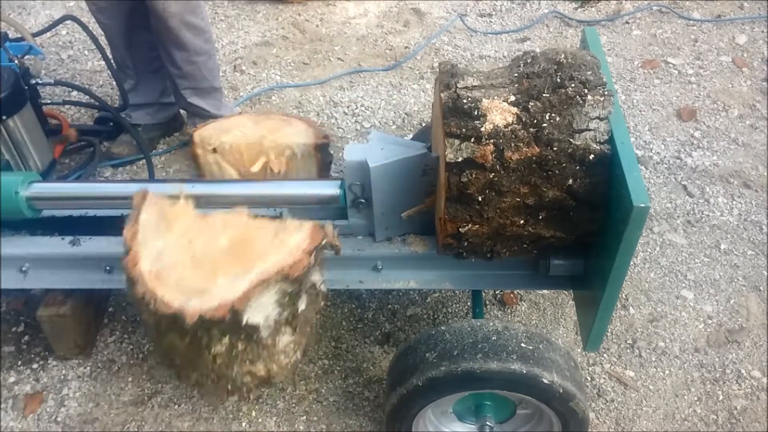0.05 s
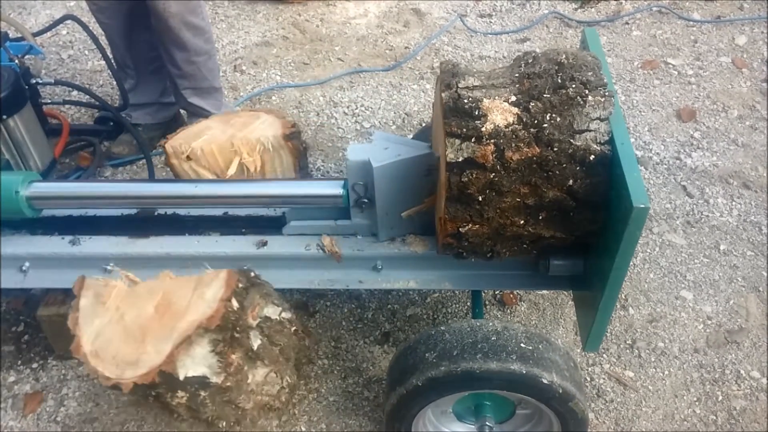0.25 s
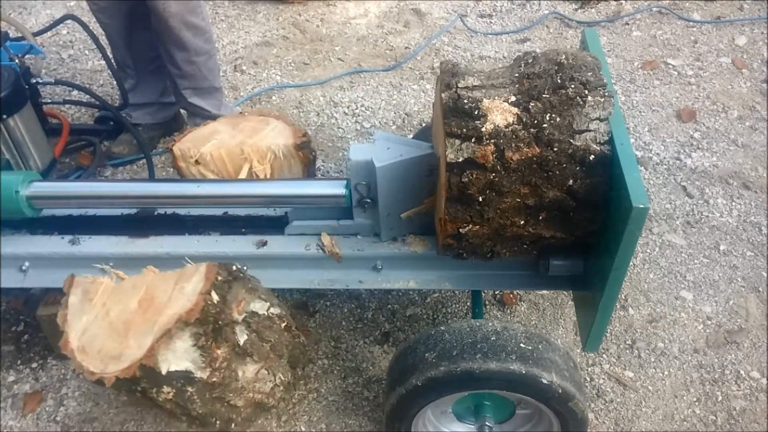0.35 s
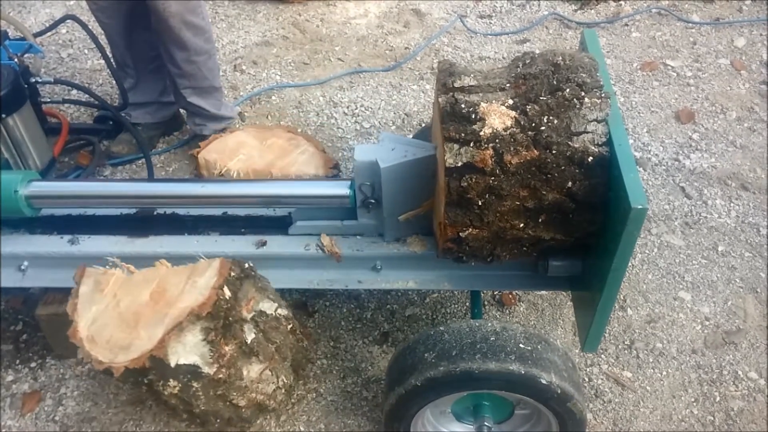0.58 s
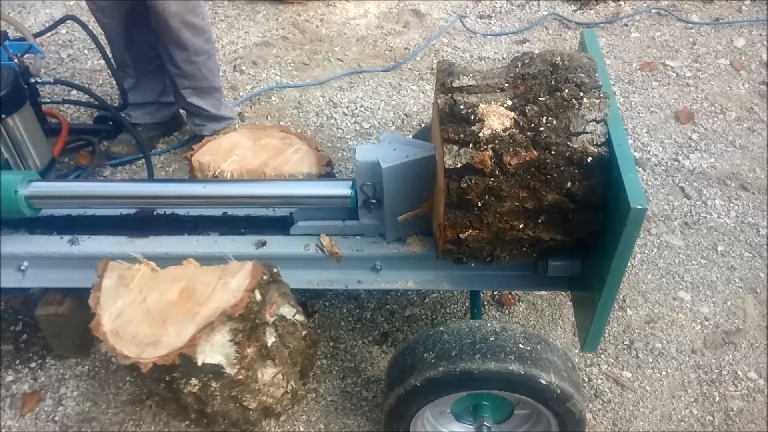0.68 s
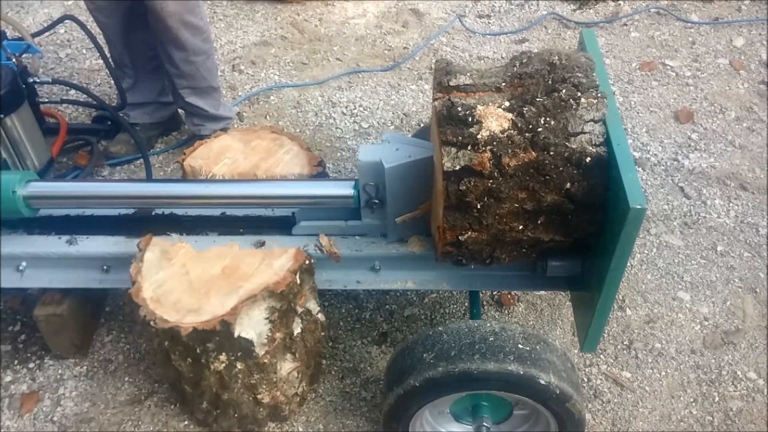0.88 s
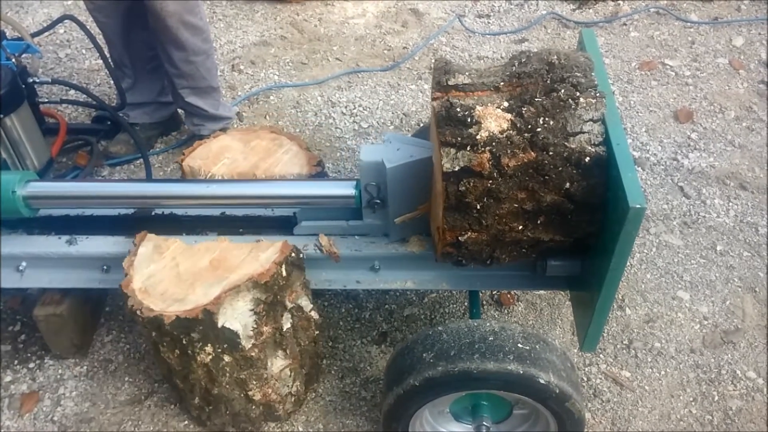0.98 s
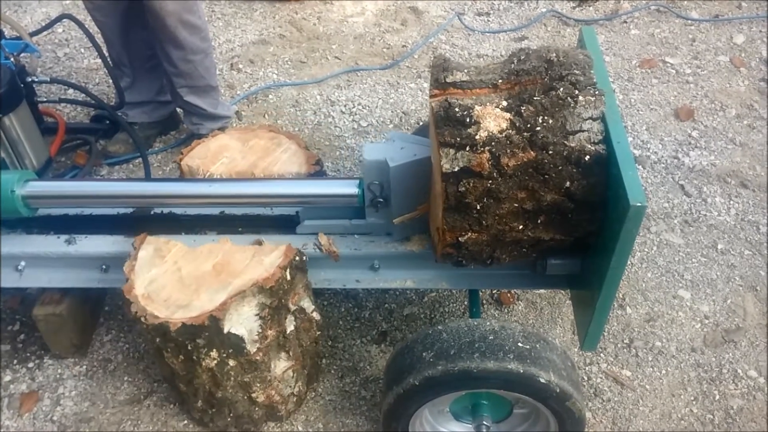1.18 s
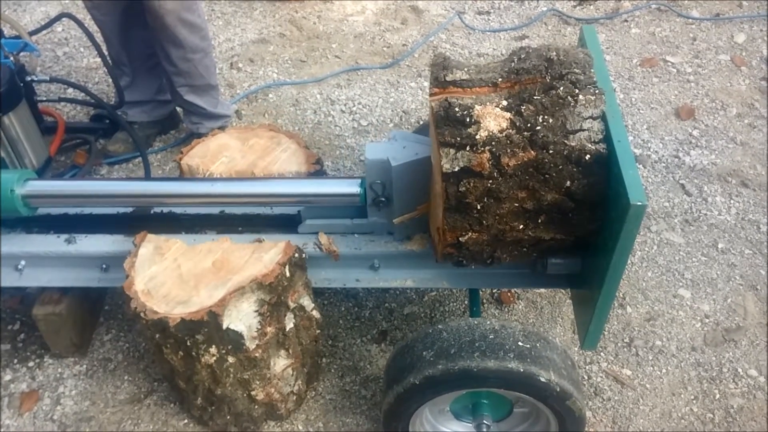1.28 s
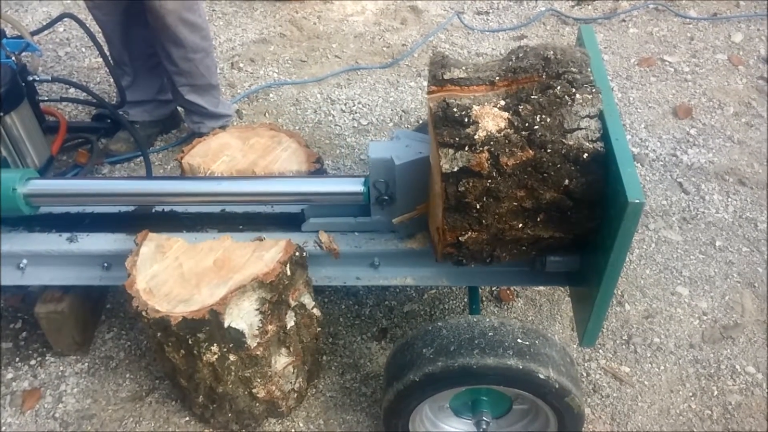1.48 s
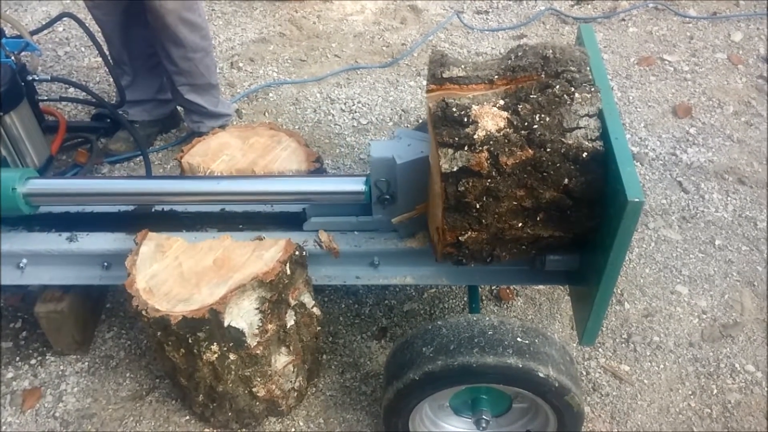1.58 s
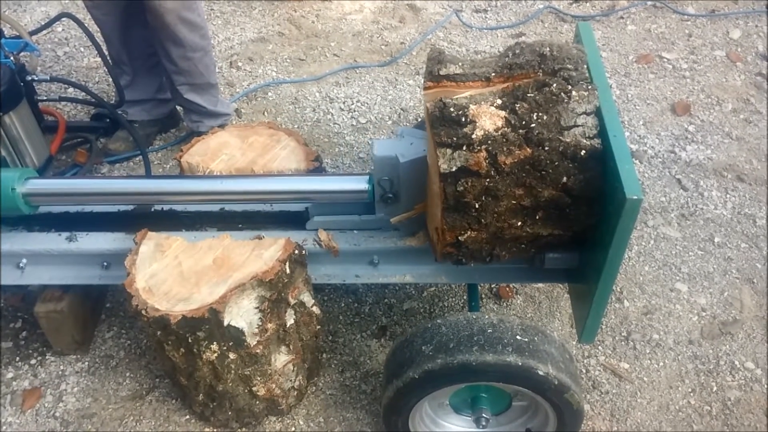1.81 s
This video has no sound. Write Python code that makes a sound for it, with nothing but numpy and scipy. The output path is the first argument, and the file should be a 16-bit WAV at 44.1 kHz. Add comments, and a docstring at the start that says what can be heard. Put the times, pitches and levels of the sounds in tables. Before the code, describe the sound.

A hydraulic log splitter cracks a thick log open over a steady motor hum.

```python
"""A hydraulic log splitter runs outdoors: motor whirr and a thin pump whine throughout.
First a half log, already split, scrapes, drops on gravel with a thud and rocks once.
From about 0.4 s the wedge tears a thick log open in sharp cracks, each an avalanche of tiny clicks
that rings the wood. The loaded pump hums and its oil hisses. Fibres crackle between the cracks;
after 1 s both thin out as the split runs. Short echoes follow the wood sounds."""
import sys
import numpy as np
from scipy import signal
from scipy.fft import rfft, irfft
from scipy.io import wavfile

SR = 44100
rng = np.random.default_rng(int(sys.argv[2]) if len(sys.argv) > 2 else 0)


def pcm_store(signal):
    """Save signal as 16-bit PCM."""
    levels = np.round(np.clip(np.atleast_2d(signal), -1, 1) * 32767)
    wavfile.write(sys.argv[1], SR, levels.astype(np.int16).T)


N = 81585

# motor and pump tones: (frequency [Hz], idle level [dB], loaded level [dB])
MOTOR_TONES = [(291.8, -45, -46.5), (494, -48.5, -58), (588, -47.5, -50.5), (614.6, -42, -36),
               (640, -71, -44), (885, -52.5, -57), (915, -69, -47), (940, -74, -48), (1110, -49.5, -51.5),
               (1882, -59, -53), (2053, -74, -54.5), (2384, -56, -54), (2912, -47.5, -65), (5690, -63, -60),
               (6930, -61, -78), (7290, -67, -72)]
# pump load: (time [s], load [1 = pushing through the log])
LOAD_CURVE = [(0, 0), (.4, 0.2), (.65, 0.41), (.9, 1.28), (1.3, 1.05), (1.85, 0.87)]
# fan and bearings: (frequency [Hz], relative density [dB])
WHIRR_SPECTRUM = [(20, -51), (45, -9), (100, -2.5), (200, -12.5), (350, -2), (550, 3), (750, -4), (950, -1),
                  (1250, -9.5), (1900, 0), (2400, -3.5), (2750, -9), (3500, -17), (4500, -28),
                  (7500, -18.5), (10000, -27.5), (16000, -29)]
# oil under pressure: (frequency [Hz], relative density [dB])
OIL_SPECTRUM = [(300, -20), (1600, 1), (3500, 9), (7500, -18), (10500, -31), (16000, -24)]
# echo colour: (frequency [Hz], gain [dB])
ECHO_SPECTRUM = [(60, -22), (300, -2), (1000, 4.5), (4000, -0.5), (15000, -3)]
# stereo width: (frequency [Hz], side re mid [dB])
SIDE_SPECTRUM = [(60, -3), (250, -22), (500, -11.5), (1000, -7), (2000, -0.5), (4000, 1), (8000, 1),
                 (14000, 1)]
# half log meets the ground: (time [s], length [s], pitch [Hz], level [dB])
THUD_EVENTS = [(.005, 0.043, 90, -32), (0.07, 0.01, 90.5, -26), (0.2427, 0.026, 104.7, -1),
               (.45, 0.0315, 159.3, -13), (.495, 0.049, 145, -25), (0.602, 0.0167, 142.6, -11.5)]
# ground rumble: (frequency [Hz], relative density [dB])
GROUND_SPECTRUM = [(20, -55), (38, -36), (60, -6), (80, 13.5), (130, 6), (250, -3.5), (600, -51),
                   (3000, -76)]
# half log scrapes and knocks:
# (time [s], contact [s], body [dB], clack [dB], grit [dB], pan L-R [dB], pitch [Hz], ring [dB])
KNOCK_EVENTS = [(.004, 0.022, -33, -31.5, -43, -1, 2170, -32),
                (.102, 0.0037, -30.5, -52, -64, 1, 760, -28.5),
                (.2405, 0.0031, -15.5, -18.5, -27, -3, 1580, -20),
                (.3028, 0.002, -22, -7, -20, 1, 1030, -15.5)]
# log on the steel beam: (frequency [Hz], relative level [dB], t60 [s])
LOG_MODES = [(196.6, -9.5, 0.029), (243.4, -0.5, 0.066), (271.3, -2.5, 0.064), (349, 4, .04),
             (409, 1, 0.055), (504, -7, 0.11), (588, 2, 0.021), (664, -5.5, 0.017), (782, -6.5, 0.031),
             (985, -8.5, .03)]
# snap of a break: (frequency [Hz], relative gain [dB])
SNAP_SPECTRUM = [(100, -18.5), (400, -7), (800, -2), (1050, 6.5), (1320, 0), (1620, 4.5), (1850, -1),
                 (2250, 4), (2800, -4.5), (3600, -6.5), (5000, -26.5), (9000, -38), (16000, -57)]
# fine splinters: (frequency [Hz], relative gain [dB])
SPLINTER_SPECTRUM = [(500, -25), (2500, -7.5), (4100, 4.5), (4800, 2), (5900, 4), (7200, -2.5),
                     (9300, -8.5), (10500, -21.5), (13500, -13), (16000, -23)]
# fibre crackle envelope: (time [s], gain [dB])
CRACKLE_CURVE = [(0, -22.5), (.33, -16.5), (.42, -8.5), (.47, 2), (.6, -4), (.72, -2), (.86, 1), (.97, 2),
                 (1.08, -11.5), (1.25, -8), (1.4, -19), (1.85, -15.5)]
# cracks, each ringing a freed sliver:
# (time [s], tearing [s], body [dB], snap [dB], splinter [dB], pan L-R [dB], pitch [Hz], ring [dB])
CRACK_EVENTS = [(.355, 0.017, -63, -30, -40.5, -0.5, 1100, -36),
                (.412, 0.0082, -46, -27, -53, 0, 1064, -25.5),
                (.432, 0.0069, -26, -14, -46, 0.5, 1660, -21),
                (.438, 0.011, -12.5, -9.5, -21.5, 0, 1060, -38),
                (.447, 0.008, -11, -13.5, -25, -0.5, 2280, -54),
                (.460, 0.0098, -12, -17.5, -20.5, -1, 2460, -16),
                (.476, 0.0172, -20.5, -41, -56, -6, 780, -40),
                (.505, 0.0023, -16.5, -21.5, -23.5, -1, 3280, -16.5),
                (.5482, 0.0033, -7, -7.5, -13, 1.5, 1870, -18.5),
                (.589, 0.0072, -18.5, -23.5, -25, 0.5, 2630, -34),
                (.624, 0.0036, -18, -24.5, -28, -0.5, 2880, -27),
                (.670, 0.0044, -30.5, -35, -48, -2, 2200, -28.5),
                (.712, 0.004, -17.5, -19.5, -20.5, -0.5, 4340, -21.5),
                (.747, .003, -28, -28, -28, 1, 4300, -29), (.788, 0.0049, -15.5, -36, -20, 0.5, 703, -17),
                (.7955, 0.0039, -9.5, -10, -22.5, 0, 2150, -17),
                (.836, 0.0024, -23, -26, -28.5, 2, 2584, -30), (.870, 0.0027, -37, -27, -35, 7, 705, -24),
                (.885, 0.0044, -34, -19, -37, 1, 2660, -23.5),
                (.897, 0.0026, -38, -26, -19.5, 3, 4000, -24),
                (.920, 0.0064, -21, -24, -51, -1.5, 1040, -28),
                (.9525, 0.0064, -20, -18.5, -36, 0.5, 3960, -21.5),
                (1.012, 0.00052, -48, -38, -49, -1, 2420, -17.5),
                (1.047, 0.0061, -19, -27, -40, -3, 5300, -40),
                (1.056, 0.0017, -27, -13, -13.5, 1, 3430, -21.5),
                (1.065, 0.0011, -16, -25, -36, 2, 969, -17),
                (1.098, 0.0038, -25, -31, -30.5, 2, 1980, -31.5),
                (1.131, .002, -28.5, -28.5, -40, -2, 3100, -27),
                (1.153, 0.0027, -17.5, -31, -36, -1, 2090, -24),
                (1.169, 0.0015, -38, -34, -28, 0, 2132, -41),
                (1.2078, 0.0023, -17.5, -15, -21.5, 1.5, 2180, -15),
                (1.220, 0.0036, -13.5, -15.5, -22.5, -0.5, 2120, -21),
                (1.249, 0.0024, -24.5, -33, -30.5, 0.5, 1870, -35),
                (1.284, 0.0014, -29.5, -38, -27, 0.5, 2020, -26.5),
                (1.335, 0.0078, -60, -33, -39, -3.5, 2410, -29.5),
                (1.441, 0.0017, -37, -34.5, -54, -2, 2170, -28),
                (1.457, 0.00096, -38, -41, -27, -5, 3300, -22),
                (1.5665, .003, -19, -13.5, -47, 1, 790, -18),
                (1.5815, 0.0024, -28.5, -20.5, -23, 0, 784, -17),
                (1.6565, 0.0015, -37, -16, -23.5, -0.5, 2200, -17),
                (1.724, 0.00087, -60, -37, -25.5, -1, 1670, -22.5)]

BODY_PAN_DB, SNAP_PAN_DB, SPLINTER_PAN_DB, SLIVER_PAN_DB = 3, -2, -1.5, -1
BODY_DECAY_S, SNAP_DECAY_S, SPLINTER_DECAY_S, SLIVER_DECAY_S = 0.0018, 0.0029, 0.0025, 0.0029
RISE_S, BODY_LAG_S, BODY_CUT_HZ, SLIVER_T60_CYCLES = 0.00014, 0.0015, 227, 36


def amp(db):
    """dB to gain."""
    return 10 ** (np.asarray(db) / 20)


def unit(x):
    """Scale to rms 1."""
    return x / np.sqrt(np.mean(x ** 2) + 1e-20)


def curve(points):
    """Breakpoints to a per-sample curve."""
    return np.interp(np.arange(N) / SR, *np.transpose(points))


def gain_at(spectrum, hz):
    """Linear gain of a dB spectrum, interpolated in log frequency."""
    points_hz, db = np.transpose(spectrum)
    return amp(np.interp(np.log(hz + 1), np.log(points_hz), db))


def add(mix, time_s, sound):
    """Mix in a stereo sound at time_s."""
    part = mix[:, max(round(time_s * SR), 0):][:, :sound.shape[1]]
    part += sound[:, :part.shape[1]]


def colour(spectrum, size=2048):
    """Causal impulse response of a spectrum."""
    log_gain = np.log(gain_at(spectrum, abs(np.fft.fftfreq(size, 1 / SR))))
    return np.fft.ifft(np.exp(np.conj(signal.hilbert(log_gain)))).real


def through(x, response):
    """Filter each channel."""
    return signal.fftconvolve(x, response[None], axes=1)[:, :x.shape[1]]


def pan(db):
    """Channel gains, left minus right = db."""
    return amp([[db / 2], [-db / 2]])


def place(pair, pan_db=0):
    """Direct and scattered signal to stereo, rms 1; widest in the treble."""
    mid = unit(pair[0])
    side = through(unit(pair[1:]), colour(SIDE_SPECTRUM))[0]
    return unit(np.array([mid + side, mid - side]) * pan(pan_db))


def clicks(size, per_s, spread_db):
    """Two random click trains of uneven strength."""
    strength = amp(spread_db * np.minimum(rng.exponential(1, (2, size)), 4))
    return strength * rng.choice([-1, 1], (2, size)) * (rng.random((2, size)) < per_s / SR)


def drift(hz):
    """Random wavering below hz, rms 1."""
    rolloff = 1 + (np.fft.rfftfreq(N, 1 / SR) / hz) ** 4
    return unit(irfft(rfft(rng.standard_normal(N)) / rolloff, N))


def noise(size, spectrum):
    """Shaped stereo noise, rms 1."""
    white = rfft(rng.standard_normal((2, size)))
    return place(irfft(white * gain_at(spectrum, np.fft.rfftfreq(size, 1 / SR)), size))


def ring(hz, t60_s):
    """One damped mode."""
    t = np.arange(SR // 8) / SR
    return np.exp(-np.log(1000) * t / t60_s) * np.sin(2 * np.pi * hz * t)


def motor_and_pump(waver=0.0021, flutter=0.32, width_rad=0.39, whirr_db=-40.5, oil_db=-51.5):
    """Steady whirr; load turns the pump whine into a hum and raises the oil hiss."""
    shaft_time_s = np.cumsum(1 + waver * drift(hz=12.4)) / SR
    load = curve(LOAD_CURVE)
    tones = np.zeros((2, N))
    for hz, idle_db, loaded_db in MOTOR_TONES:
        phase = 2 * np.pi * (hz * shaft_time_s + rng.random())
        rms = amp(idle_db + load * (loaded_db - idle_db)) * (1 + flutter * drift(hz=9.1))
        tones += np.sqrt(2) * rms * np.sin(phase + np.array([[width_rad], [-width_rad]]))
    whirr = amp(whirr_db) * noise(N, WHIRR_SPECTRUM)
    oil_hiss = amp(oil_db) * load * noise(N, OIL_SPECTRUM)
    return tones + whirr + oil_hiss


def yard_echoes(x, gain_db=-13.5, t60_s=0.17, delay_s=0.0054):
    """Short, thin reflections off machine and ground."""
    t = np.arange(SR // 2) / SR
    envelope = (t > delay_s) * np.exp(-np.log(1000) * t / t60_s)
    tail = place(envelope * clicks(len(t), per_s=2000, spread_db=0.68)) / np.sqrt(len(t))
    echoes = signal.fftconvolve(x, tail, axes=1)[:, :N]
    return amp(gain_db) * through(echoes, colour(ECHO_SPECTRUM))


def ground_thuds(sag=0.28, rumble_db=-13, rumble_decay_s=0.035, pan_db=2.5):
    """Half log lands: a few low swings of sagging pitch, then a rumble as it settles."""
    out, t = np.zeros((2, N)), np.arange(SR // 3) / SR
    for time_s, length_s, hz, db in THUD_EVENTS:
        progress = np.minimum(t / length_s, 1)
        phase = 2 * np.pi * np.cumsum(hz * (1 + sag * (.5 - progress))) / SR
        push = -np.sin(np.pi * progress) ** 2 * np.sin(phase)
        settling = amp(rumble_db) * progress * np.exp(-t / rumble_decay_s)
        add(out, time_s, amp(db) * (push + settling * noise(len(t), GROUND_SPECTRUM)))
    return out * pan(pan_db)


def wood_voices():
    """Ringing body, snap, splinters: (impulse response, click decay [s], pan L-R [dB])."""
    modes = sum(amp(db) * ring(hz, t60_s) for hz, db, t60_s in LOG_MODES)
    body = signal.sosfilt(signal.butter(2, BODY_CUT_HZ, "high", fs=SR, output="sos"), modes)
    return [(body, BODY_DECAY_S, BODY_PAN_DB),
            (colour(SNAP_SPECTRUM), SNAP_DECAY_S, SNAP_PAN_DB),
            (colour(SPLINTER_SPECTRUM), SPLINTER_DECAY_S, SPLINTER_PAN_DB)]


def fibre_crackle(body_db=-36, snap_db=-30.5, splinter_db=-36.5, ping_db=-36):
    """Single fibres let go at random and excite the wood; fine slivers ping."""
    fibres = clicks(N, per_s=580, spread_db=3.5)
    pings = sum(through(clicks(N, per_s=17, spread_db=0.83), ring(hz, t60_s=.009))
                for hz in np.geomspace(1900, 6320, 14))
    out = amp(ping_db) * place(pings, SLIVER_PAN_DB)
    for (response, _, pan_db), db in zip(wood_voices(), (body_db, snap_db, splinter_db)):
        out += amp(db) * place(through(fibres, response), pan_db)
    return out * amp(curve(CRACKLE_CURVE))


def wood_bursts(events, size=4000):
    """Crack or knock: a click avalanche excites the wood and rings one piece at its own pitch."""
    out, t, voices = np.zeros((2, N)), np.arange(size) / SR, wood_voices()
    for time_s, length_s, body_db, snap_db, splinter_db, pan_db, hz, ring_db in events:
        sliver_ring = np.diff(ring(hz, SLIVER_T60_CYCLES / hz), prepend=0)
        sliver = (sliver_ring, SLIVER_DECAY_S, SLIVER_PAN_DB)
        levels_db = (body_db, snap_db, splinter_db, ring_db)
        lags_s = (BODY_LAG_S, 0, 0, 0)
        for (response, decay_s, voice_pan_db), db, lag_s in zip(voices + [sliver], levels_db, lags_s):
            envelope = np.minimum(t / RISE_S, 1) * np.exp(-np.maximum(t - length_s, 0) / decay_s)
            sound = through(envelope * clicks(size, per_s=7000, spread_db=1), response)
            rms = amp(db) * np.sqrt(np.mean(envelope ** 2))
            add(out, time_s + lag_s, rms * place(sound, voice_pan_db + pan_db))
    return out


def scene():
    """Wood and its echoes over thuds and machine."""
    wood = wood_bursts(CRACK_EVENTS) + wood_bursts(KNOCK_EVENTS) + fibre_crackle()
    return wood + yard_echoes(wood) + ground_thuds() + motor_and_pump()


def record(dry):
    """Microphone treble roll-off, peak clipping, band limit."""
    rolloff_hz, ceiling, edge_hz = 12500, 0.98, 16100
    soft = signal.sosfilt(signal.butter(2, rolloff_hz, fs=SR, output="sos"), dry)
    band_limit = signal.firwin(255, edge_hz, window=("kaiser", 9), fs=SR)
    return signal.oaconvolve(np.clip(soft, -ceiling, ceiling), band_limit[None], "same")


dry = scene()
out = record(dry)
pcm_store(out)
```